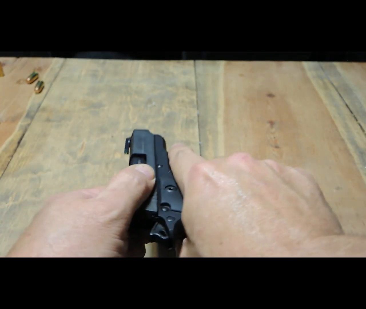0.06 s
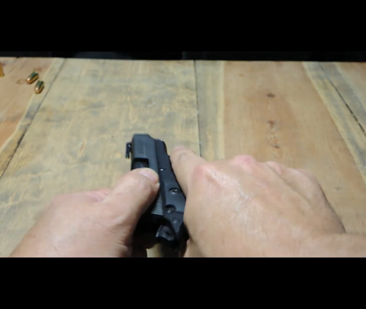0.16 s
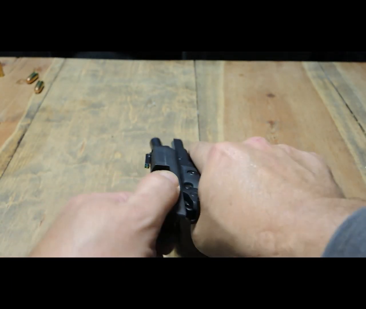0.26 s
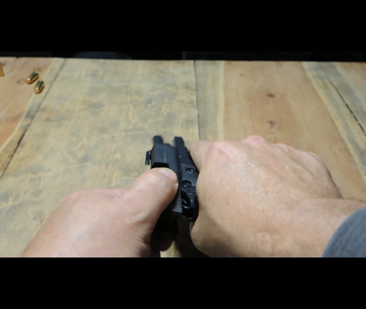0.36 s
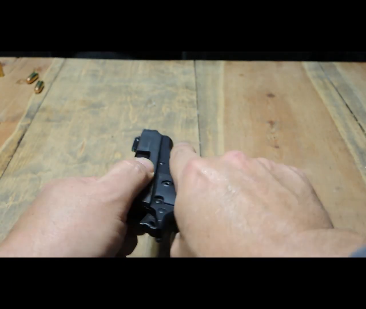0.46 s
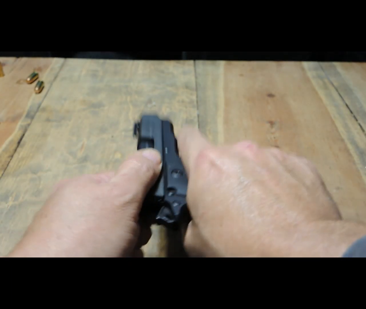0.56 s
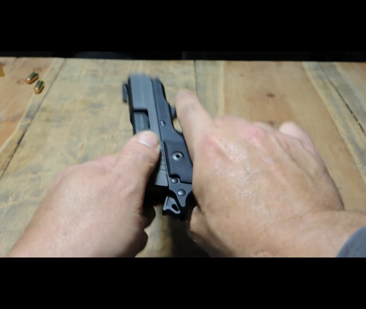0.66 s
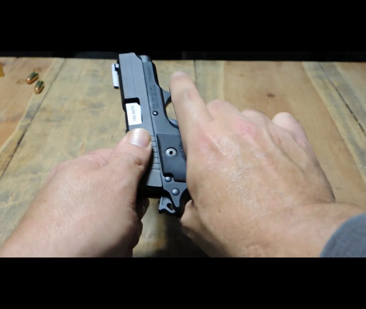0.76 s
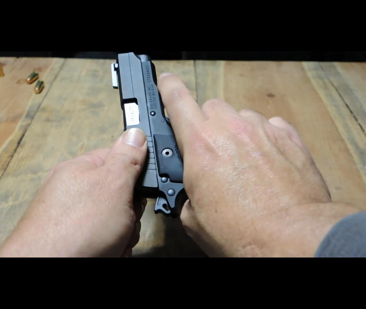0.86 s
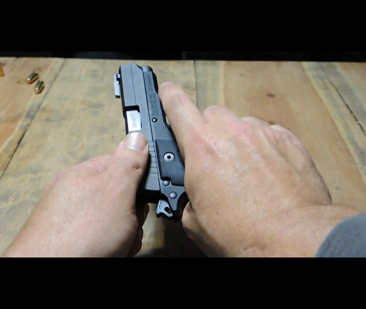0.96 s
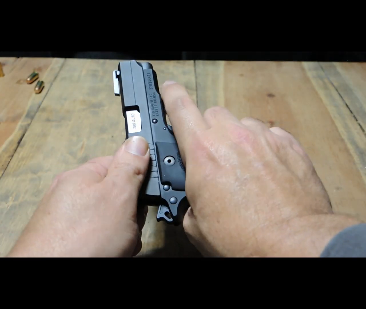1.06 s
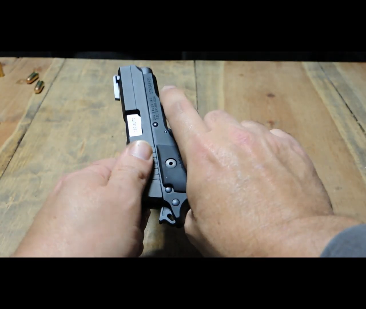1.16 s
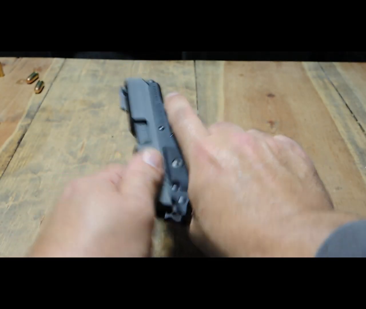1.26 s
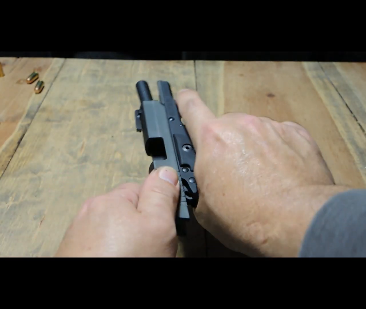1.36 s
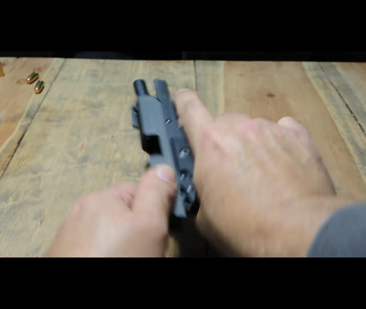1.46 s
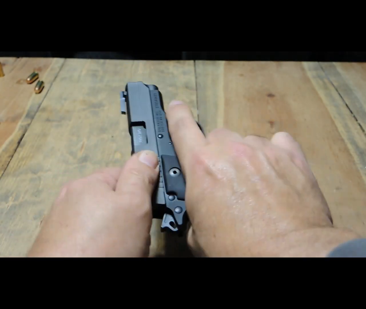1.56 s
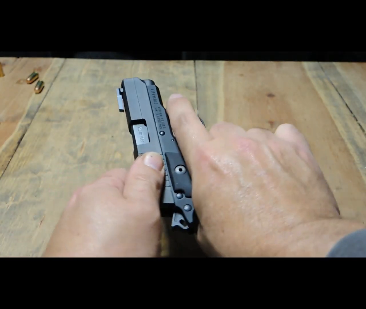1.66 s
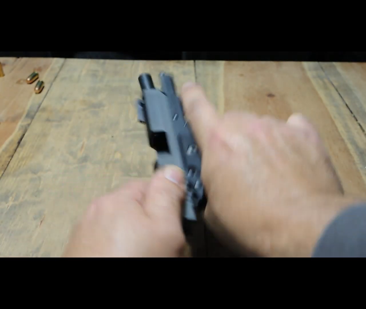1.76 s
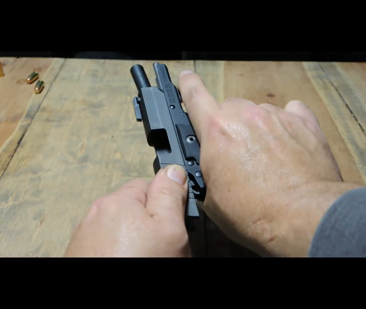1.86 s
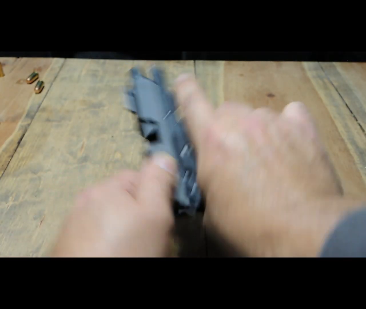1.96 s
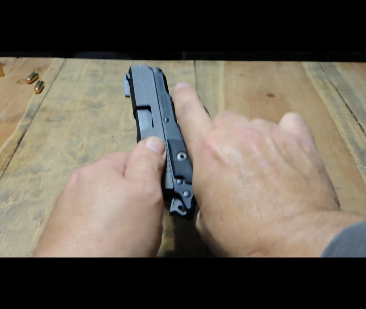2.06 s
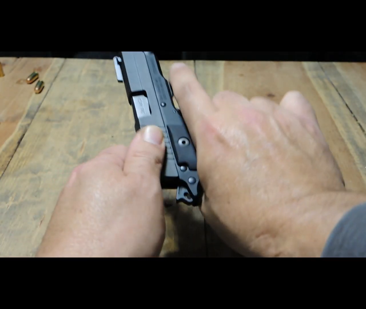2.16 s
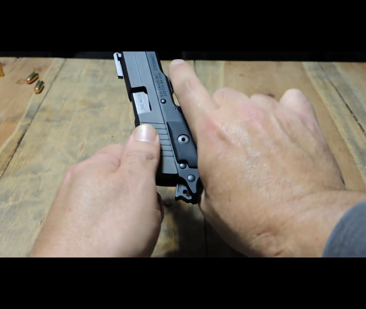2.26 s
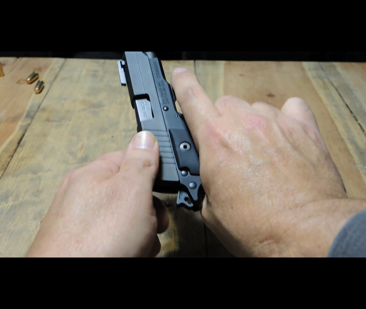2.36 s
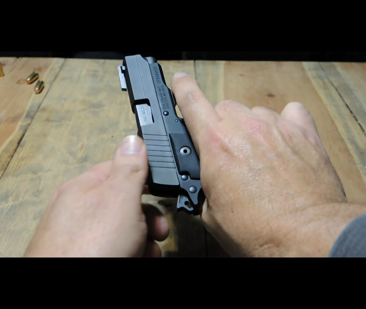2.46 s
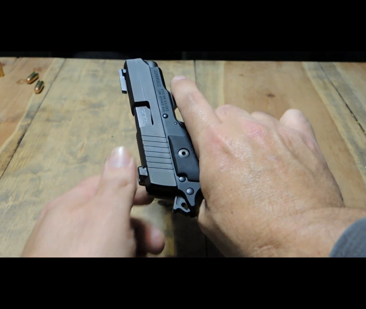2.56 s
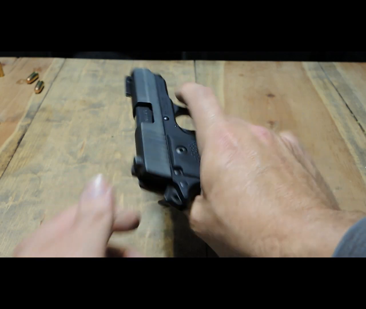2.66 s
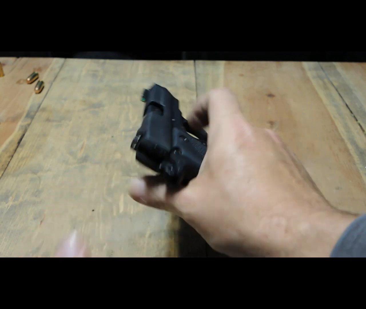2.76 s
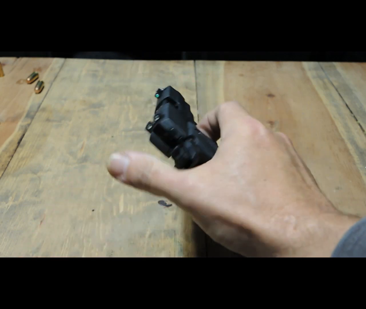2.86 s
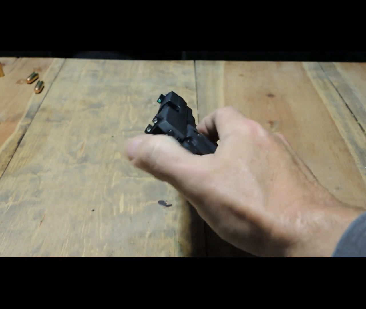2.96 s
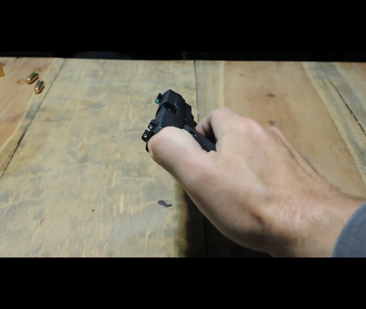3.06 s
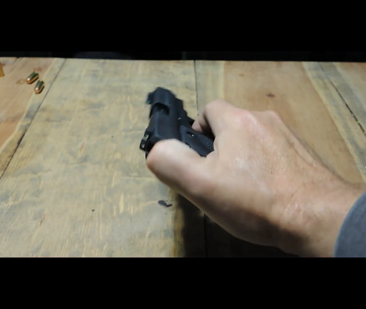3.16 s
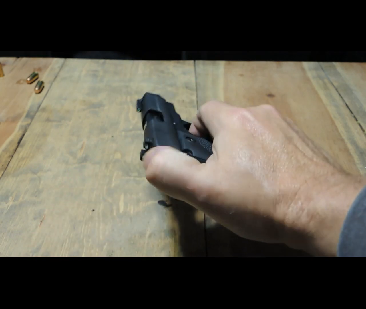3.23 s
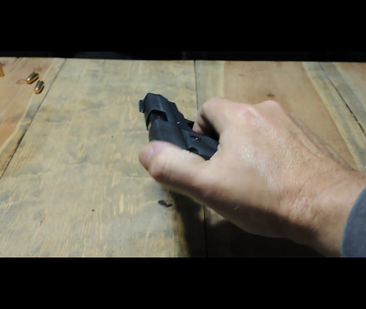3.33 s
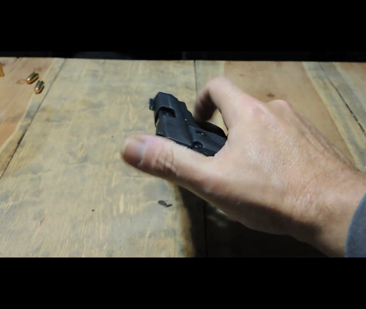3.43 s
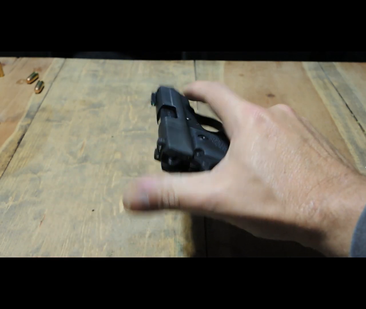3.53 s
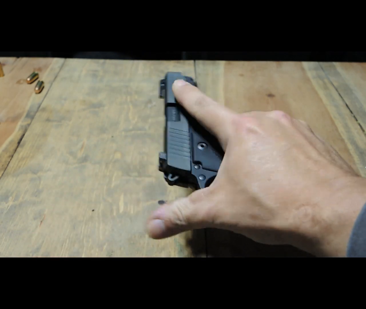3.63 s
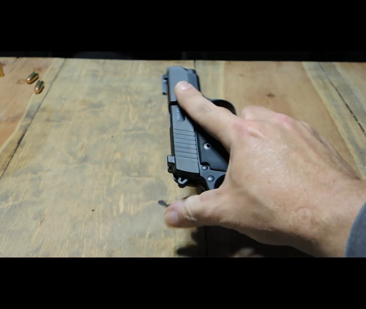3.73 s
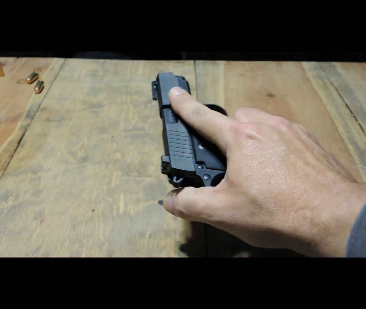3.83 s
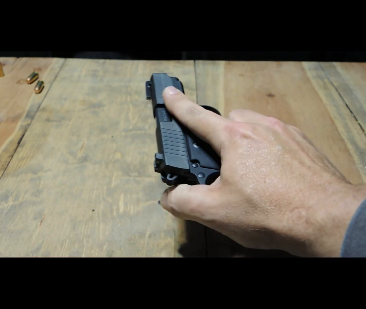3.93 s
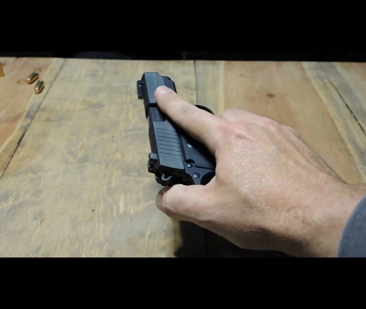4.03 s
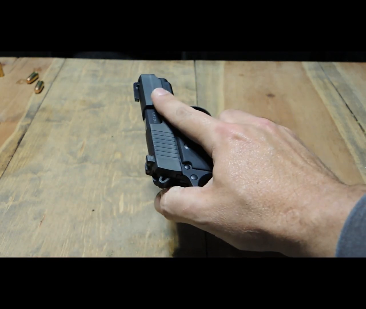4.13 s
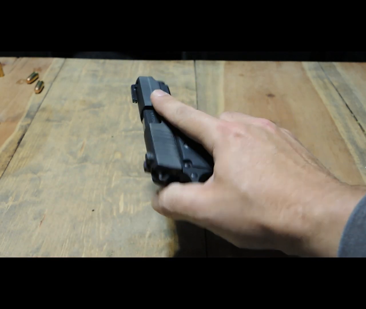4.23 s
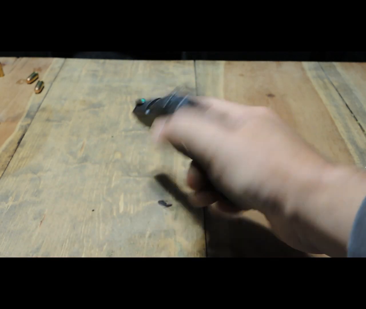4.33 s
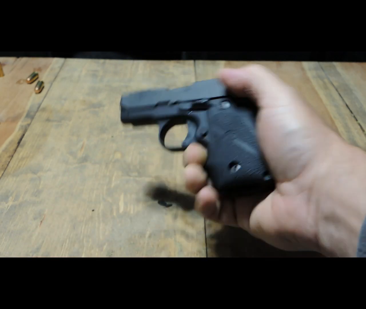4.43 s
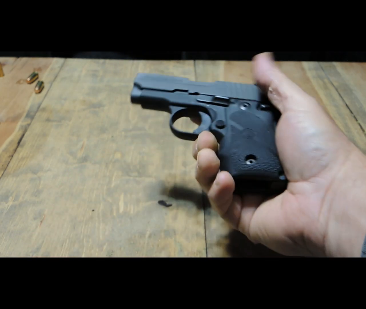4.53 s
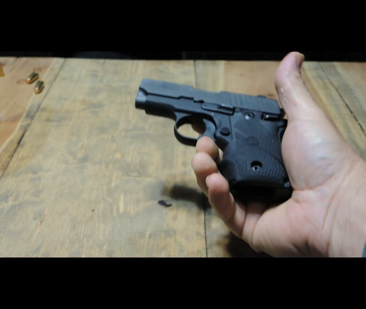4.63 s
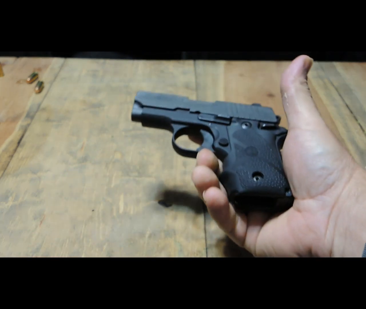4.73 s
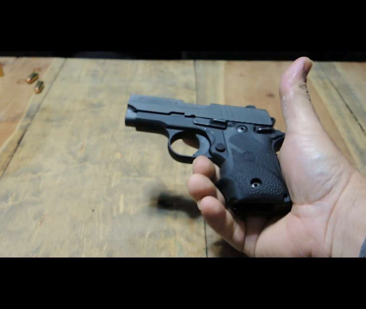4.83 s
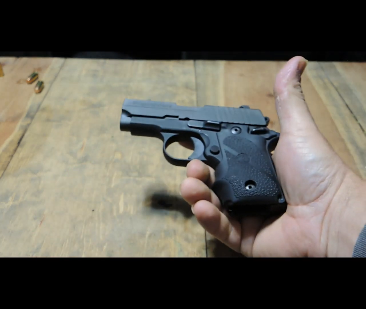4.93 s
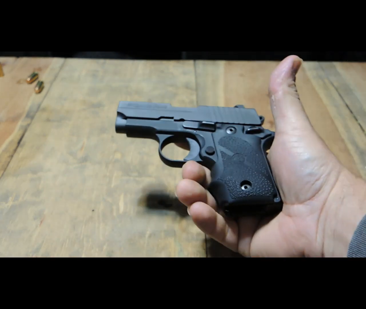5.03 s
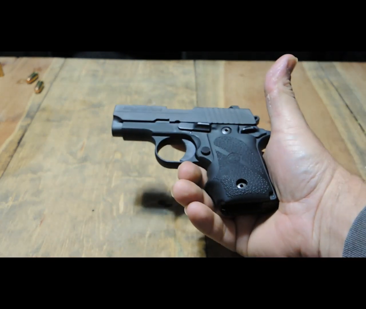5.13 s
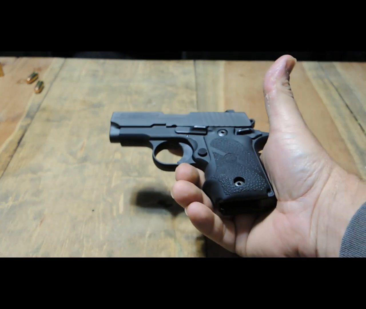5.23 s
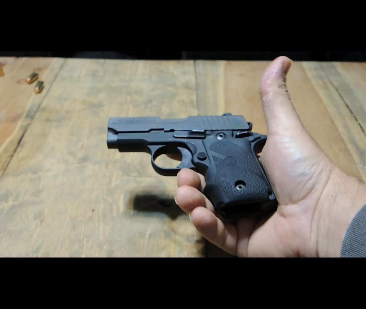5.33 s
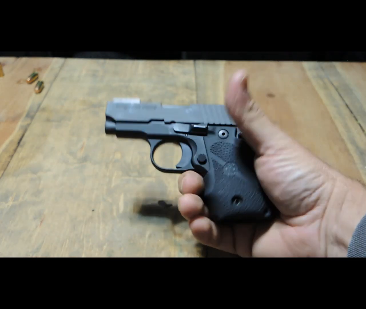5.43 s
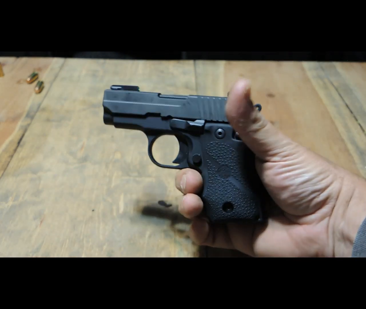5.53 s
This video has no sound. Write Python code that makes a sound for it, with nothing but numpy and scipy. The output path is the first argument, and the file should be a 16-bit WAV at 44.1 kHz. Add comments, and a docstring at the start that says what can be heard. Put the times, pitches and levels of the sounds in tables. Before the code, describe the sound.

Close stereo pickup over a wooden table in a bare room, with steady low hum, faint buzz and hiss. At 0 s a steel slide slaps home. Light catches near 0.28 s lead into a fast backward rack at 0.31-0.35 s and a bright forward slam at 0.51-0.55 s. A second cycle goes back at 1.39-1.45 s and forward at 1.59-1.63 s; a third, slightly duller, back at 1.84-1.91 s and forward at 2.07-2.11 s. Each is a rapid run of clicks and short gritty scrape ending in a hard, slightly distorted blow, small rebound, dull thump, shimmering spring ring and short room tail. The background ducks, then recovers. Faint skin rubs come around 2.9-3 s, crisp small lever clicks at 3.3 and 3.5 s, weak ticks near 3.7 s, then barely audible handling swishes and tiny ticks around 4.4-4.6 and 5 s, leaving room noise.

```python
"""Pistol racked in a bare room

A small steel pistol is racked three times over a wooden table, then its levers click and it turns in the hand.
Each stroke is a run of modal metal contacts ending in a hard blow at a stop; beating coil tones shimmer on.
Grainy noise makes the rails and skin; echoes and a banded tail make the table and room, over hum and hiss.
The blows overload the near microphone, and its gain control ducks the background."""
import sys
import numpy as np
from scipy import signal
from scipy.fft import rfft, irfft, next_fast_len
from scipy.io import wavfile
from scipy.ndimage import uniform_filter1d

SR = 44100
rng = np.random.default_rng(int(sys.argv[2]) if len(sys.argv) > 2 else 0)


def unload_audio(sound):
    """Save the sound as a 16-bit wav file, at the path given as the first command line argument."""
    columns = np.transpose(np.atleast_2d(sound))
    # keep every value between -1 and 1, then stretch to whole-number steps
    steps = np.round(np.clip(columns, -1, 1) * 32767)
    wavfile.write(sys.argv[1], SR, steps.astype(np.int16))


N = 246384
EDGE_HZ = 14250  # upper band limit


def amp(db):
    """Decibels to gain."""
    return 10 ** (np.asarray(db) / 20)


def unit(x):
    """Scales to rms 1."""
    return x / np.sqrt(np.mean(x ** 2) + 1e-20)


def read(points, hz):
    """Reads a table along a log-frequency axis."""
    f, value = np.transpose(points)
    return np.interp(np.log(hz + 1), np.log(f + 1), value)


def add(mix, start_s, sound):
    """Mixes a sound in at start_s, trimmed to the mix."""
    at = round(start_s * SR)
    sound = sound[max(-at, 0):]
    part = mix[max(at, 0):][:len(sound)]
    part += sound[:len(part)]


def noise(spectrum, size, tilt_db_per_octave=0):
    """Random-phase noise of rms 1 with a spectrum and a tilt above 1 kHz."""
    fft_size = next_fast_len(size, True)
    hz = np.fft.rfftfreq(fft_size, 1 / SR)
    octaves = np.log2(np.clip(hz, 1000, EDGE_HZ))
    gain = amp(read(spectrum, hz) + tilt_db_per_octave * octaves)
    bins = gain * np.exp(2j * np.pi * rng.random(len(hz)))
    return unit(irfft(bins, fft_size)[:size])


def grains(size, depth_db, order=60):
    """Uneven gain of rms 1: many tiny touches run together."""
    drift = unit(uniform_filter1d(rng.standard_normal(size), order))
    return unit(amp(depth_db * drift))


def pair(a, b, likeness):
    """Blends two unrelated signals into a left and right that are partly alike."""
    size = next_fast_len(len(a), True)
    same = np.clip(read(likeness, np.fft.rfftfreq(size, 1 / SR)), 0, 1)
    mid = rfft(a, size) * np.sqrt((1 + same) / 2)
    side = rfft(b, size) * np.sqrt((1 - same) / 2)
    return irfft(np.array([mid + side, mid - side]), size)[:, :len(a)]


# slide strokes: start t/s, stop t/s, stop name, tilt/dB per octave, start click/dB, scrape/dB, blow/dB,
# blow t60/s, spring/dB, low thump at start/dB, low thump at stop/dB
STROKES = [ (-.04, 0.0, "home", 1.5, 0, -29, -1, 0.026, -9.5, -30, -26),
           (0.3082, 0.3541, "back", 0.7, 5, -18.5, 8.5, 0.017, 2, -17, -9),
           (.5128, 0.551, "home", 2, 10, -21, 8.5, 0.056, -4, -22, -9.5),
           (1.391, 1.45, "back", 0.5, 7, -26.5, 10.5, 0.08, 3.5, -14.5, -9.5),
           (1.586, 1.63, "home", 0.5, 11.5, -27, 6.5, .027, -6, -28, -13.5),
           (1.8409, 1.911, "back", -1.5, 3, -26.5, 6.5, 0.022, -7, -45, -9.5),
           (2.0698, 2.1112, "home", -.5, 7, -18, 9, 0.039, -2.5, -25, -28)]
# click that sets the slide moving: t60/s, tilt re stroke/dB per octave, ring/dB (+0.5 in contact)
START_CLICK = (0.0087, -.2, -18.5)
# blow, by stop: tilt re stroke/dB per octave, ring/dB (+0.5 in contact)
STOP_BLOW = {"home": (4.3, -7), "back": (-.5, -3.5)}
# single rebound, by stop: delay/s, loss re blow/dB, t60/s, tilt re stroke/dB per octave, ring/dB (+0.5 in contact)
REBOUND = {"home": (0.0148, 3.5, 0.0056, 3.5, -5), "back": (.005, 4.5, .007, 4, 0)}
# slide catching on barrel, hammer, lugs: t/s, level/dB, tilt/dB per octave, ring/dB (+0.5 in contact)
CATCHES = [(0.2817, -15, 0, -9), (.3172, -11, 0, -2), (.324, -7, 2, -9), (.3338, 15.5, 2, -23),
           (.422, -2, 6, -4.5), (.534, 4, -3, -11.5), (1.341, -25, -7.5, -26), (1.3576, -9.5, 0, -12),
           (1.42, -1.5, 4, -16), (1.424, .5, 0.5, -13), (1.4413, -10, 1, -4), (1.612, 5.5, -2, -7),
           (1.7987, -12, 1, -7), (1.848, -6, 6, -12), (1.877, -2, 0, -9), (1.8958, -10, 9, -3),
           (2.076, -1.5, 2.5, -10), (2.093, 3, -.5, -7), (2.101, -4, -2, -12)]


def slide(catch_t60_s=0.011):
    """Steel struck at start, stop and rebound of each stroke, and where the slide catches on other parts."""
    out = np.zeros(N)
    for start, stop, end, stroke_tilt, click_db, _, blow_db, blow_t60_s, *_ in STROKES:
        delay_s, loss_db, *rebound = REBOUND[end]
        hits = (
            (start, click_db, *START_CLICK),
            (stop, blow_db, blow_t60_s, *STOP_BLOW[end]),
            (stop + delay_s, blow_db - loss_db, *rebound))
        for s, db, t60_s, tilt, ring_db in hits:
            add(out, s, contact(db, t60_s, tilt + stroke_tilt, ring_db, position(s)))
    for s, db, tilt, ring_db in CATCHES:
        add(out, s, contact(db, catch_t60_s, tilt, ring_db, position(s)))
    return out


# slide travel, by stop: fraction of the way back [0-1]
TRAVEL = {"home": 0, "back": 1}


def position(s):
    """Slide travel at time s: crosses linearly from stop to stop during each stroke."""
    points = []
    for start, stop, end, *_ in STROKES:
        points += [(start, 1 - TRAVEL[end]), (stop, TRAVEL[end])]
    return np.interp(s, *np.transpose(points))


# crack colour: f/Hz, density/dB per Hz
CRACK = [(100, -24), (500, -33.5), (900, -13.5), (1500, -6.5), (2700, -0.5), (4000, 4), (6200, 2.5),
         (7500, 0.5), (9300, 3), (12000, -0.5), (14000, -9.5)]
# slide and barrel modes: f/Hz, t60/s, level with slide home/dB, level with slide back/dB
STEEL = [(1541, 0.023, -27.5, -16), (2626, 0.029, -22, -19.5), (3290, 0.023, -23, -20.5),
         (3620, 0.023, -30, -4.5), (5320, 0.02, -12.5, -10), (6443, 0.023, -18, 2),
         (8830, 0.028, -4.5, -37), (9140, 0.032, -6, -34), (10240, 0.072, -8, -7.5),
         (10150, 0.0075, -12.5, -18), (10990, 0.015, -14.5, -16.5), (11300, 0.063, -6.5, -3.5),
         (11270, .03, -6, -44), (13640, 0.019, -3, -25.5)]


def contact(level_db, t60_s, tilt_db_per_octave, ring_db, back, rise_s=0.00025, detune_spread=0.0033):
    """Crack of dense, fast-dying modes plus discrete steel modes weighted by slide travel."""
    t = np.arange(SR // 14) / SR
    crack = noise(CRACK, len(t), tilt_db_per_octave) * amp(-60 * t / t60_s)
    hz, ring_t60_s, home_db, back_db = np.transpose(STEEL)[:, :, None]
    phase, shift = rng.uniform(-1.07, 1, (2, len(STEEL), 1))
    mode_db = home_db + np.clip(back, 0, 1) * (back_db - home_db) - 60 * t / ring_t60_s
    # each mode is detuned slightly at random
    detuned_hz = hz * (1 + detune_spread * shift)
    ring = (amp(mode_db) * np.sin(2 * np.pi * detuned_hz * t + np.pi * phase)).sum(0)
    onset = 1 - np.exp(-t / rise_s)
    return amp(level_db) * (crack + amp(ring_db + 0.5) * ring) * onset


# spring dense modes: f/Hz, density stretched/dB per Hz, density compressed/dB per Hz
SPRING = [(400, -52, -31), (1015, -27, -24.5), (1520, -27.5, -18), (2550, -13.5, -8), (3400, -13, 1),
          (4425, -13, -6), (6180, -12, -7.5), (6600, -10.5, 0), (7070, -15.5, -9), (9100, -9, -3),
          (9700, -.5, 0.5), (11140, -2, 0), (12450, -10.5, -8), (13940, -10.5, -11.5)]
# spring and guide rod tones: f/Hz, level stretched/dB, level compressed/dB
COILS = [(1416, -39, -39), (2740, -27, -26.5), (3270, -26, -29), (6530, -26, -17), (9700, -15, -24),
         (10170, -11.5, -13), (11100, -23, -26), (11250, -21.5, -13), (11360, -13.5, -24)]
# spring envelope, by stop (home = stretched, back = compressed): t60/s, swell time constant/s
SPRING_RING = {"home": (0.46, 0.016), "back": (0.29, .02)}


def spring(split_hz=22, chatter_db=2.0):
    """Close coil modes shaken at each stop: bright and long stretched, duller and shorter compressed."""
    out = np.zeros(N)
    t = np.arange(SR * 2 // 3) / SR
    for _, stop, end, *_, db, _, _ in STROKES:
        t60_s, swell_s = SPRING_RING[end]
        colour = [(hz, a + TRAVEL[end] * (b - a)) for hz, a, b in SPRING]
        tones = [(hz, a + TRAVEL[end] * (b - a)) for hz, a, b in COILS]
        shimmer = noise(colour, len(t)) * grains(len(t), chatter_db, order=130)  # coils chatter on the rod
        for hz, tone_db in tones:
            beat_hz = hz + split_hz * rng.standard_normal((2, 1))  # beating pair
            beat = np.sin(2 * np.pi * (beat_hz * t + rng.random((2, 1))))
            shimmer += amp(tone_db) * beat.sum(0)
        swell = 1 - np.exp(-t / swell_s)
        add(out, stop, shimmer * amp(db - 60 * t / t60_s) * swell)
    return out


def rails(lag_s=0.007):
    """Steel drags over steel in tiny slips, from lag_s after stroke start to about its stop."""
    out = np.zeros(N)
    for start, stop, _, _, _, db, *_ in STROKES:
        size = max(round((stop - start - lag_s) * SR), 256)
        window = signal.windows.tukey(size, 0.2)
        scrape = noise(CRACK, size, tilt_db_per_octave=0.5) * grains(size, depth_db=3.5)
        add(out, start + lag_s, amp(db) * window * scrape)
    return out


# low thump colour: f/Hz, density/dB per Hz
THUMP = [(30, -13), (120, -5), (230, 1), (480, 1), (750, -4), (1000, 2.5), (1650, 0), (2200, -5.5),
         (5000, -33)]


def low_thump(t60_s=0.017, push_s=0.00037, push_db=3):
    """Low thump under each stroke end, as of an overloaded input: a brief push and a dull, short noise burst."""
    out = np.zeros(N)
    t = np.arange(SR // 10) / SR
    push = amp(push_db) * (1 - t / push_s) * np.exp(-t / push_s)
    for start, stop, *_, start_db, stop_db in STROKES:
        for s, db in ((start, start_db), (stop, stop_db)):
            burst = noise(THUMP, len(t)) * amp(-60 * t / t60_s)
            add(out, s, amp(db) * (push + burst))
    return out


# hammer, safety and trigger clicks: t/s, level/dB, tilt/dB per octave, note f/Hz, note level re crack/dB
LEVERS = [(3.003, -38, -2, 8760, -3), (3.248, -28.5, -3, 2800, -9), (3.2955, -34, -3, 2800, -8),
          (3.3144, -10.5, 1.2, 2830, -9), (3.3172, -17.5, 0.5, 4300, -4), (3.48, -16, 1.5, 4500, -11),
          (3.49, -22.5, 0, 6400, 0), (3.4981, -13.5, 1, 3950, -8), (3.505, -14, 2.5, 4500, -6),
          (3.526, -24, 8, 4400, -13), (3.674, -30.5, -5, 1690, -3), (3.688, -34.5, -4, 2800, -3),
          (4.516, -34, 5, 9500, -2), (5.034, -41, 1, 10500, -8)]
# small-part snap colour: f/Hz, density/dB per Hz
SNAP = [(100, -7), (600, -16), (1100, -2.5), (1700, -3.5), (2800, -1), (4300, 1.5), (5500, 2), (6600, -0.5),
        (9200, 3.5), (11500, -0.5), (14000, -6)]


def levers(crack_t60_s=0.01, ring_t60_s=0.013, rise_s=0.00019):
    """Small parts snap against the frame: a noise crack plus one brief note each."""
    out = np.zeros(N)
    t = np.arange(SR // 20) / SR
    onset = 1 - np.exp(-t / rise_s)
    for s, db, tilt, hz, ring_db in LEVERS:
        crack = noise(SNAP, len(t), tilt) * amp(-60 * t / crack_t60_s)
        note = amp(ring_db - 60 * t / ring_t60_s) * np.sin(2 * np.pi * (hz * t + rng.random()))
        add(out, s, amp(db) * (crack + note) * onset)
    return out


# skin sliding on steel: centre t/s, length/s, level/dB, tilt/dB per octave
RUBS = [(2.908, 0.08, -48, 3), (2.997, 0.069, -52.5, 0), (3.601, .07, -45, -14.5), (3.88, .1, -57, -1),
        (4.397, 0.14, -54, 4), (4.491, 0.1, -51, -6), (4.6, 0.16, -56.5, -3)]
# skin noise colour: f/Hz, density/dB per Hz
SKIN = [(300, -17), (3000, -17), (4700, -8), (6500, -8), (7500, -6), (8900, 4), (10500, -3), (13500, -12)]


def hands():
    """Short, grainy noise swishes of skin over slide and grip."""
    out = np.zeros(N)
    for s, length_s, db, tilt in RUBS:
        size = round(length_s * SR)
        rub = np.hanning(size) * noise(SKIN, size, tilt) * grains(size, depth_db=2.5)
        add(out, s - length_s / 2, amp(db) * rub)
    return out


# left-right likeness of the direct sound: f/Hz, likeness [0-1]
NEAR_SAME = [(200, .9), (900, 0.78), (2500, 0.97), (6000, 0.89), (10000, 0.69), (14000, .42)]
# reflections off table and nearby things: delay/s, level/dB
ECHOES = [(.0032, -25), (.0068, -19), (.0125, -21.5)]


def direct(a, b):
    """Two ports hear slightly different sides of the gun, plus its first reflections."""
    near = pair(a, b, NEAR_SAME)
    out = near.copy()
    for delay_s, db in ECHOES:
        for port, sound in zip(out, near):
            add(port, delay_s, amp(db) * sound)
    return out


# room decay: f/Hz, t60/s
ROOM_T60 = [(200, .3), (1300, 0.4), (3400, 0.32), (6500, 0.36), (10000, 0.41), (14000, 0.17)]
# room tail colour: f/Hz, level/dB
ROOM_COLOUR = [(150, -3), (700, -6), (1500, 2), (3200, 2), (5000, 0), (7500, -1), (10000, -5), (14000, -1)]
# left-right likeness of the tail: f/Hz, likeness [0-1]
ROOM_SAME = [(200, 1), (2500, 0.92), (6000, 0.17), (10000, 1), (14000, .4)]


def room(x, wet_db=-9, build_s=0.0017):
    """Convolves with a diffuse noise tail that builds up and dies band by band."""
    size = SR // 2
    hz, t, z = signal.stft(rng.standard_normal((2, size)), SR, nperseg=256)
    z = z * amp(read(ROOM_COLOUR, hz)[:, None] - 60 * t / read(ROOM_T60, hz)[:, None])
    build = 1 - np.exp(-np.arange(size) / SR / build_s)
    tail = pair(*(signal.istft(z, SR, nperseg=256)[1][:, :size] * build), ROOM_SAME)
    response = amp(wet_db) * tail / np.linalg.norm(tail[0])
    return signal.oaconvolve(x[None], response, axes=1)[:, :N]


# room air noise and microphone hiss: f/Hz, density/dB per Hz
AIR = [(22, -31), (48, -15.5), (110, -11.5), (210, -9.5), (450, -12.5), (700, -15.5), (1100, -14),
       (1500, -16), (2000, -14), (2600, -18), (3400, -20), (4000, -23), (9500, -25), (14000, -29.5)]
# left-right likeness of the air noise: f/Hz, likeness [0-1]
AIR_SAME = [(60, 0.209), (150, 0.48), (370, 0.418), (920, 0.62), (2290, 0.53), (5710, 0.64), (14200, 1)]
# mains hum and buzz: f/Hz, level/dB rms
HUM = [(60, -66.5), (240, -63), (420, -58), (780, -69), (1020, -71), (1080, -68), (1140, -67),
       (1260, -68.5), (1620, -76), (1680, -65), (1860, -65), (1980, -66.5), (2100, -73.5), (2160, -68.5)]


def background(air_db=-49.5, waver_rad=0.25):
    """Steady air noise plus mains harmonics with slowly wandering phase."""
    t = np.arange(N) / SR
    knots_s = np.linspace(0, t[-1], num=24)
    hum = np.zeros(N)
    for hz, db in HUM:
        waver = waver_rad * np.interp(t, knots_s, rng.standard_normal(len(knots_s)))
        hum += amp(db) * np.sqrt(2) * np.sin(2 * np.pi * (hz * t + rng.random()) + waver)
    air = pair(noise(AIR, N), noise(AIR, N), AIR_SAME)
    return amp(air_db) * air + hum


def scene(count=3):
    """Gun radiates differently per direction; the room gathers all, the low thump stays out of the room tail."""
    sides = [slide() + levers() for _ in range(count)]
    soft = [spring() + rails() + hands() for _ in range(2)]
    wet = sum(room(side) for side in sides) / np.sqrt(count)
    wet = wet + amp(-3.0) * room(soft[0])
    near = direct(sides[0] + soft[0] + low_thump(), sides[1] + soft[1] + low_thump())
    return near + wet + background()


def record(dry, threshold_db=-12, slope=0.69, recover_db_per_s=38, sense_s=0.011, ceiling=0.92, bias=0.035):
    """Gain control ducks after each blow, the input saturates a little unevenly, then the band limit."""
    r = np.exp(-1 / (sense_s * SR))
    power = signal.lfilter([1 - r], [1, -r], (dry ** 2).mean(0))
    power_db = 10 * np.log10(power + 1e-12)
    # peak hold falling at recover_db_per_s
    fall_db = np.arange(N) / SR * recover_db_per_s
    held_db = np.maximum.accumulate(power_db + fall_db) - fall_db
    over_db = np.maximum(held_db - threshold_db, 0)
    # saturate at twice the sample rate
    fine = signal.resample_poly(dry * amp(-slope * over_db), 2, 1, axis=1)
    bent = ceiling * (np.tanh(fine / ceiling + bias) - np.tanh(bias))
    clipped = signal.resample_poly(bent, 1, 2, axis=1)
    low_pass = signal.firwin(401, EDGE_HZ, window=("kaiser", 8), fs=SR)
    return signal.oaconvolve(clipped, low_pass[None], "same", axes=1)


dry = scene()
out = record(dry)
unload_audio(out)
```